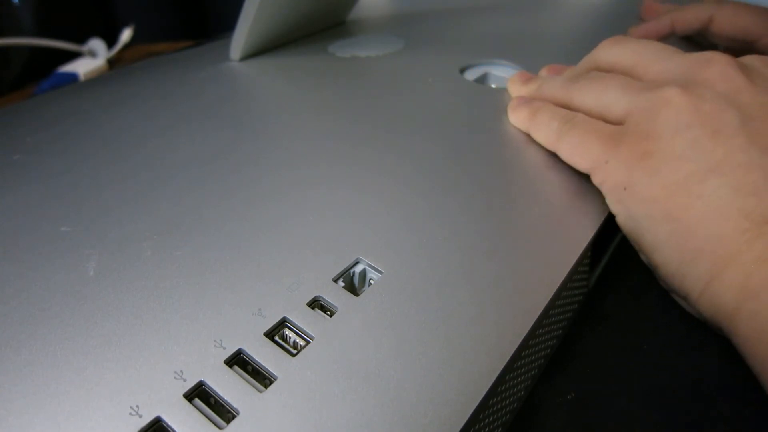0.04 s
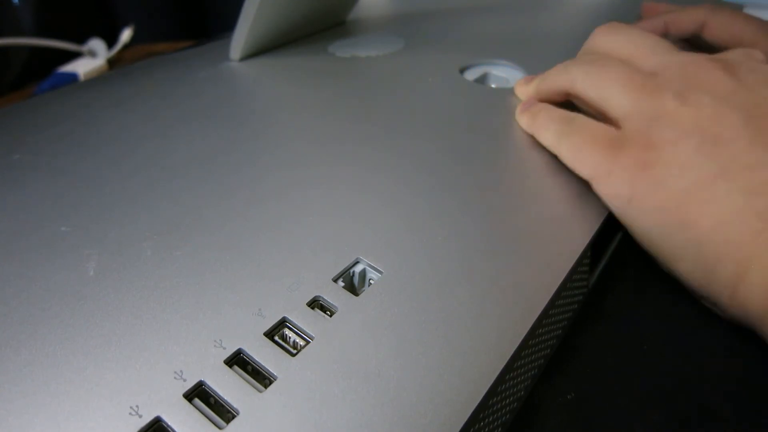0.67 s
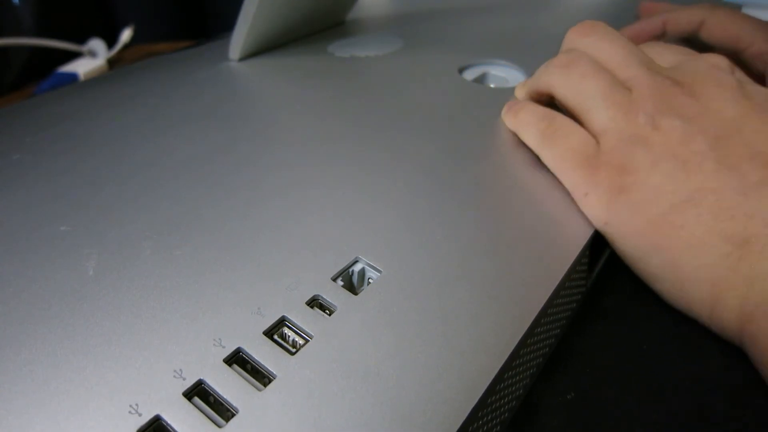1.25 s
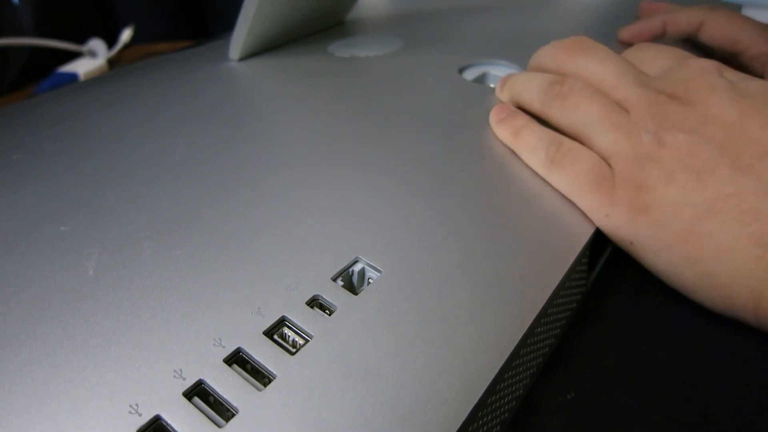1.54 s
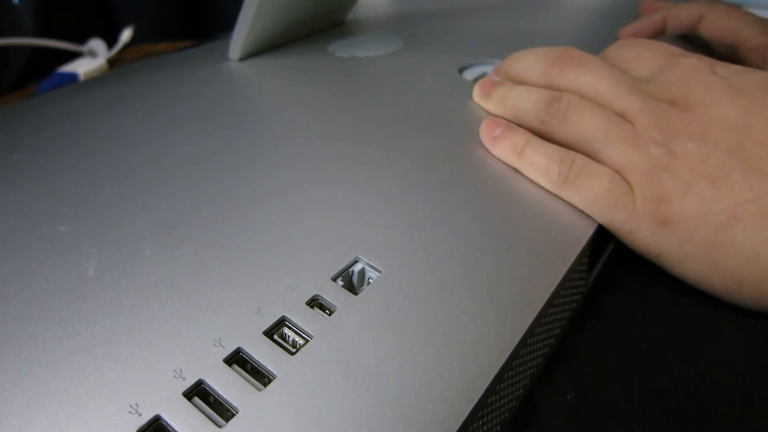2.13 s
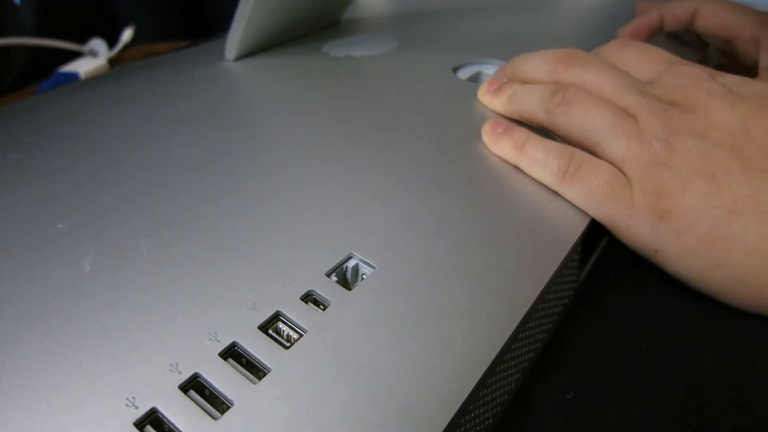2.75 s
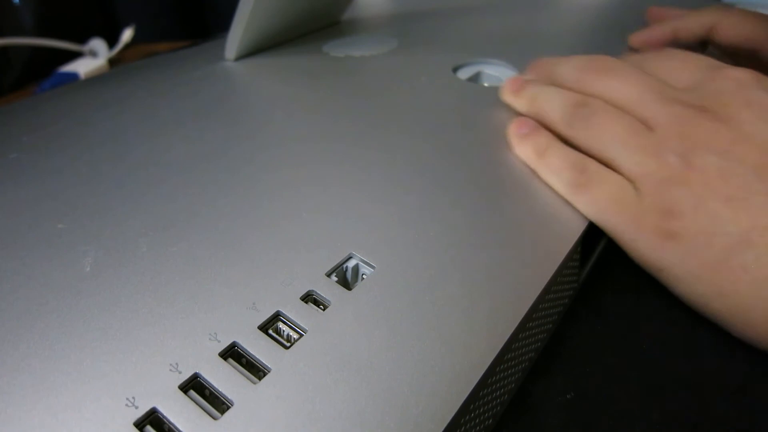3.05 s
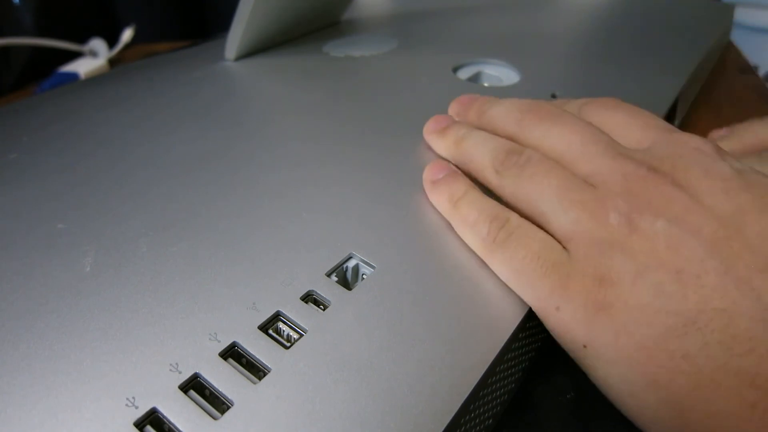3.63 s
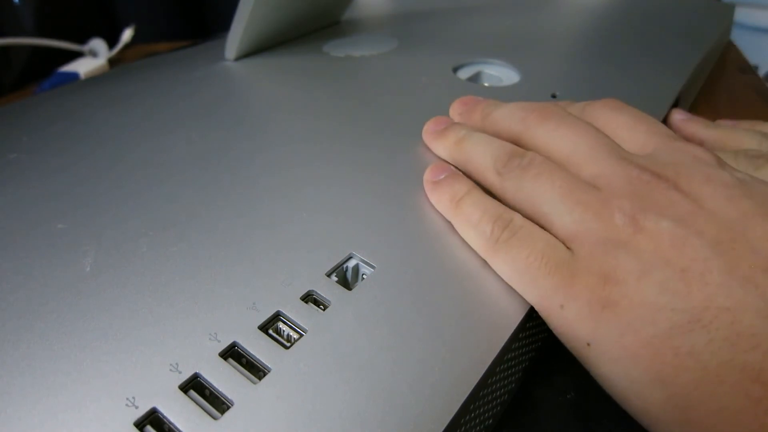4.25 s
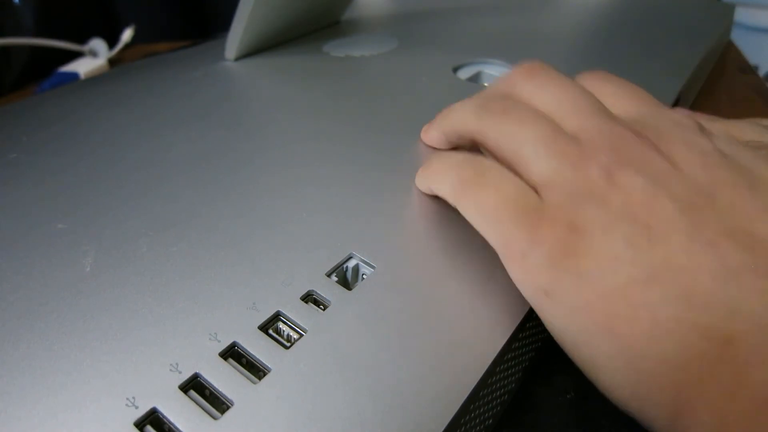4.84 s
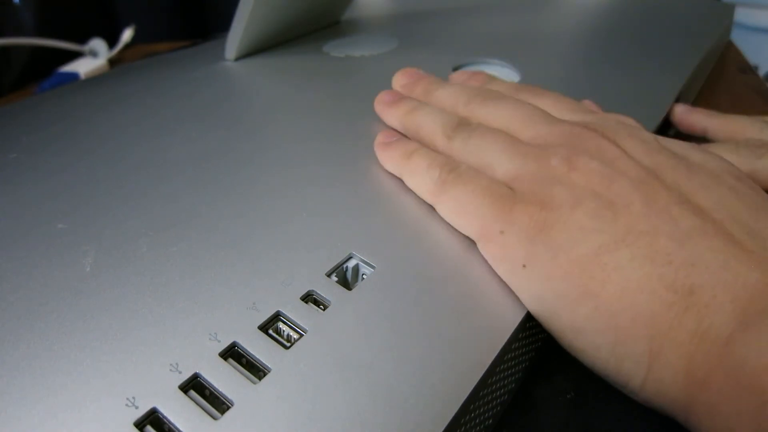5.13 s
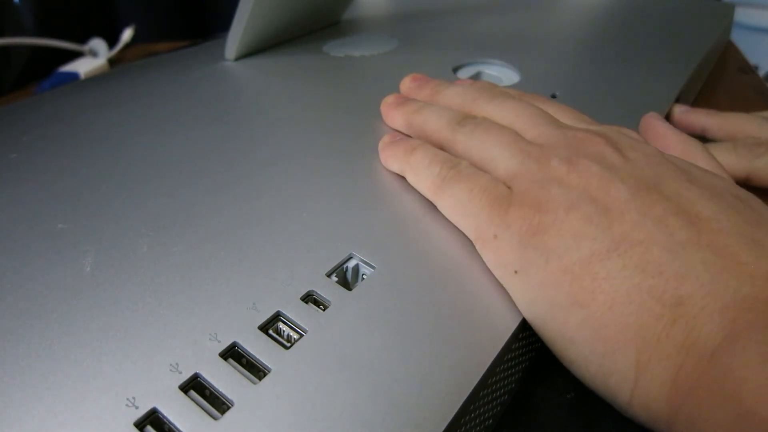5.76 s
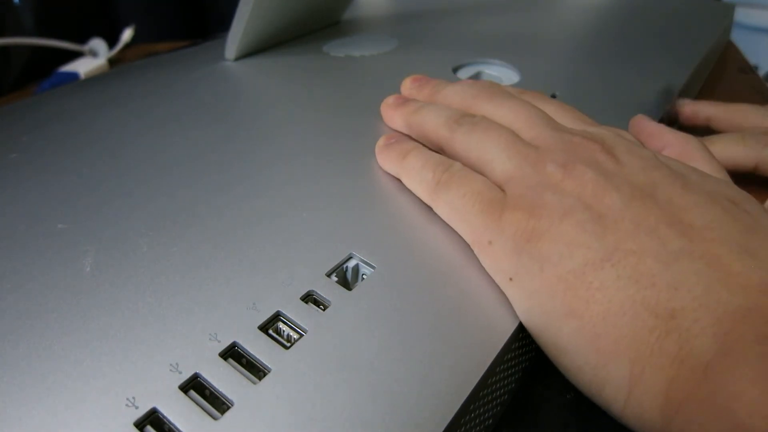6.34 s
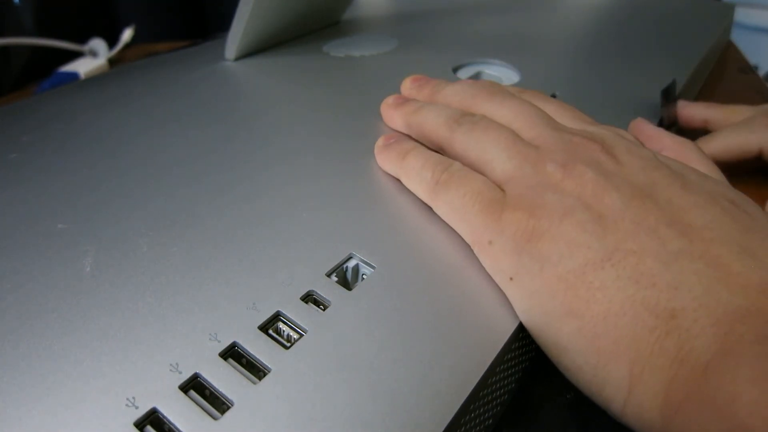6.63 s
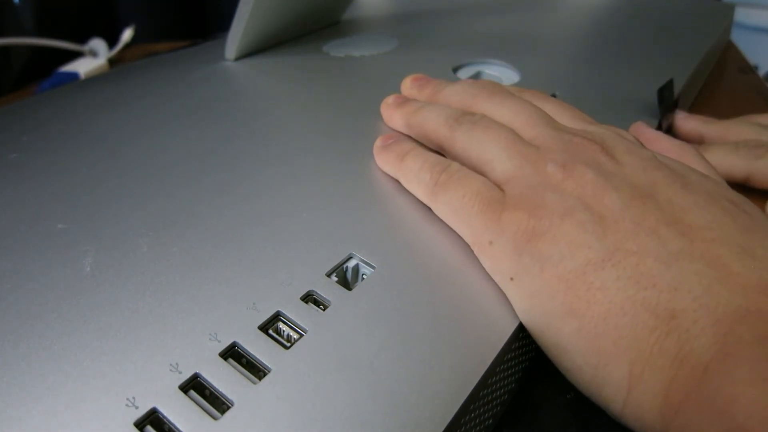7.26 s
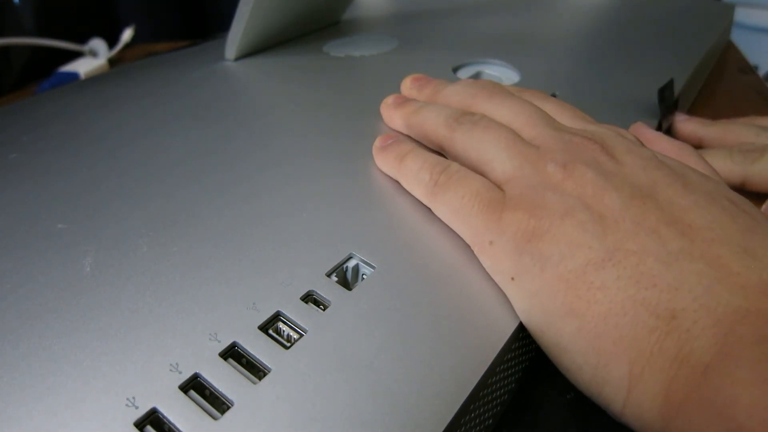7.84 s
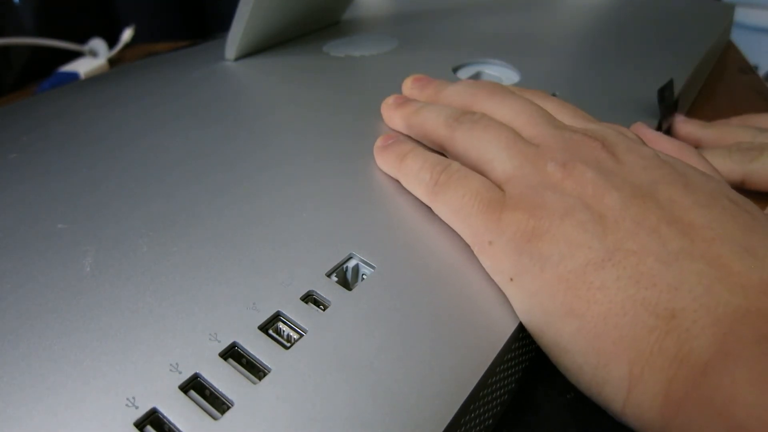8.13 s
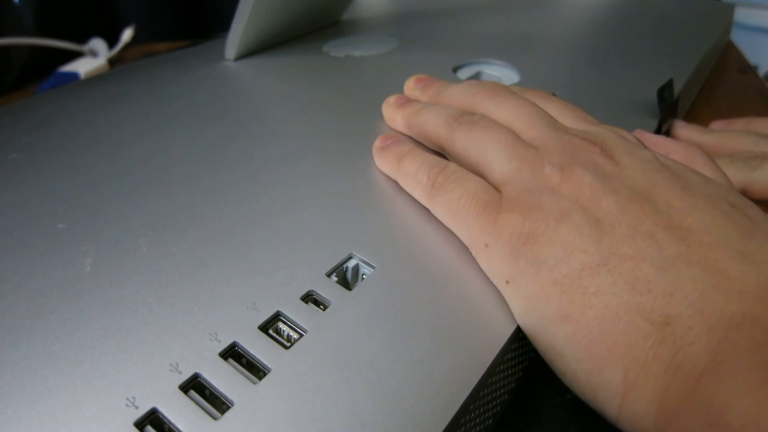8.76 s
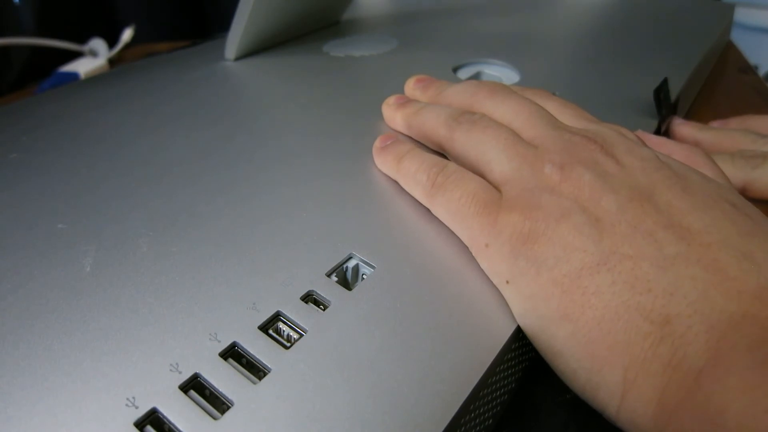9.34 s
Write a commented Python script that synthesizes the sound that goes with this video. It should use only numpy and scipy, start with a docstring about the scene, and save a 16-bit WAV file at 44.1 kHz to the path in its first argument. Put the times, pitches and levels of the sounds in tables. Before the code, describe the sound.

Fingers knock on a hollow metal computer case, then slide over it with a soft hiss and grip a panel. A latch snaps hard, and memory modules clack, squeak faintly and grind in their guides. Two more latch snaps follow, then a short grind, sparse ticks and one last firm clack. The sounds are close to the microphone, over the steady low hum of a small room.

```python
"""A hand presses memory modules into a metal-cased computer, over the steady hum of a small room.
First, fingers knock on the hollow case, slide over it and grip, shaking its panels.
At 3.3 s a latch snaps hard; gain control ducks everything and recovers slowly.
Up to 5 s modules clack, squeak and grind in their guides. Latches snap again at 5.9 and 6.3 s.
A short grind follows at 7 s, then sparse contact ticks and a last firm clack at 8.6 s."""
import sys
import numpy as np
from scipy import signal
from scipy.fft import rfft, irfft, next_fast_len
from scipy.io import wavfile
from scipy.ndimage import uniform_filter1d

SR = 44100
rng = np.random.default_rng(int(sys.argv[2]) if len(sys.argv) > 2 else 0)


def to_wav(s):
    """Save 16-bit WAV."""
    ch = np.atleast_2d(s).T  # columns
    pcm = np.round(np.clip(ch, -1, 1) * 32767)  # PCM
    wavfile.write(sys.argv[1], SR, pcm.astype(np.int16))


N = 414099
T = np.arange(int(0.45 * SR)) / SR  # time within one event [s]

# latches and edges snap home:
# (time [s], level [dB], case [dB re level], lead-in time constant [s], t60 [s], ring [Hz], top end [dB])
SNAPS = [(2.676, -25, -2.5, .0003, 0.0077, 3040, -5), (3.265, 1, -24.5, 0.0019, 0.018, 9100, -0.5),
         (3.4695, -22, -9, 0.0056, 0.033, 12800, -5), (3.588, -18.5, -16, 0.00091, 0.027, 12300, -3.5),
         (3.789, -10.5, -14.5, 0.00077, 0.016, 8200, -7), (5.894, -25, -2.5, 0.002, 0.022, 2550, 9),
         (5.903, -20.5, -8.5, 0.0016, 0.043, 2580, 1), (6.317, -17, -12.5, 0.0052, 0.012, 10000, -1),
         (6.3271, -4, -18, 0.00018, 0.022, 2650, 2.5), (6.9962, -27.5, -10, .001, .035, 8700, 0)]
# contact ticks: (time [s], level [dB], ring [Hz])
TICKS = [(2.9813, -24.5, 10700), (2.993, -31, 9000), (3.939, -36, 4700), (5.8335, -30.5, 9000),
         (5.861, -32, 9000), (6.961, -25.5, 2420), (6.972, -37, 2450), (6.983, -36, 2450),
         (7.009, -31, 8500), (7.021, -33.5, 9000), (7.3202, -34, 6000), (7.47, -34, 6600),
         (7.5251, -32, 12100), (7.7094, -33.5, 6960), (8.843, -34.5, 5900), (8.8657, -34.5, 5700)]
# fingers on the case: (time [s], level [dB], hardness as tilt [dB/octave])
KNOCKS = [(0.046, -24, 0), (0.132, -16.5, -3.5), (0.201, -12.5, 1), (0.689, -36.5, -3), (1.074, -16, .5),
          (1.463, -38, -4.5), (2.854, -21.5, 0.4), (3.078, -15, 0.1), (6.907, -37.5, -3.5),
          (8.276, -40, -6)]
# module against slot: (time [s], level [dB], crack [dB re level], rattle t60 [s])
CLACKS = [(0.589, -21.5, -18.5, 0.017), (0.756, -35, -8.5, 0.076), (1.041, -35.5, -20, 0.036),
          (1.504, -29.5, -24, 0.018), (1.537, -36, -6, .05), (2.317, -39.5, -5.5, .045),
          (2.342, -40.5, -2, .045), (3.723, -34.5, -9, .07), (3.913, -39, -6, 0.074),
          (4.273, -34, -11, .05), (4.471, -33.5, -20, 0.046), (4.638, -42.5, -18, .05),
          (4.731, -29, -22, 0.11), (4.915, -41.5, -20, 0.068), (5.207, -40.5, -23, 0.063),
          (5.332, -44.5, -7, .1), (6.253, -35, -8, .05), (6.339, -27, 1, 0.14), (6.971, -28, -14, 0.063),
          (8.583, -32, -15, 0.12), (8.5934, -17.5, -15, 0.044), (8.995, -44, -22, .06),
          (9.229, -41, -24, .05)]
# pushes that flex the shell: (time [s], level [dB], spectral centre [Hz])
PUSHES = [(.116, -24.5, 229), (.134, -11, 478), (.134, -20, 229), (.589, -32, 620), (1.076, -26, 229),
          (2.6, -32, 620), (2.65, -31, 229), (3.789, -18.5, 506), (4.471, -45, 640), (4.729, -24, 635),
          (5.903, -27.5, 620), (5.904, -21.5, 120), (5.918, -26, 229)]
# a module's edge binds: (time [s], level [dB], length [s], starting pitch [Hz])
SQUEAKS = [(0.587, -39.5, 0.021, 1442), (3, -42, 0.024, 1385), (3.588, -40, 0.016, 1227),
           (3.742, -42.5, 0.037, 1686), (3.788, -38.5, 0.024, 1370), (3.866, -59.5, 0.095, 1170),
           (4.262, -61.5, 0.057, 3280), (4.54, -62, 0.054, 3350)]
# friction strokes: (mid-stroke time [s], length [s], level [dB])
SLIDES = [(.365, 0.074, -53.5), (0.5, 0.13, -55), (.68, .16, -60), (1.245, 0.15, -46.5),
          (1.359, 0.068, -49.5), (1.475, 0.24, -49.5), (1.682, 0.16, -48), (1.867, 0.09, -54.5),
          (2.043, 0.22, -60), (2.607, 0.34, -51.5), (2.741, 0.1, -49.5), (3.037, 0.18, -44),
          (3.197, 0.26, -48), (3.37, 0.33, -42.5), (3.555, 0.32, -50), (3.754, 0.092, -44.5),
          (4.278, .07, -55), (4.734, 0.095, -51.5), (4.79, 1, -55), (4.978, 0.1, -60), (5.667, 0.31, -61.5),
          (7.06, 0.21, -55)]  # skin on smooth metal
RUBS = [(2.52, .08, -50.5), (2.625, 0.17, -36), (2.74, 0.11, -48), (3.007, 0.037, -41.5), (3.05, 0.03, -44),
        (3.165, 0.061, -49), (3.245, 0.035, -43.5)]  # skin gripping a panel
GRINDS = [(3.755, 0.048, -42.5), (4.29, 0.18, -54.5), (4.565, .09, -52), (4.66, 0.16, -54.5),
          (4.82, 0.11, -53.5), (6.98, .08, -47), (7.07, 0.18, -54)]  # module in its guides

# struck modes: (frequency [Hz], level [dB], t60 [s])
CASE_MODES = [(222, -10.5, 0.41), (419, -6, 0.22), (501, -21, 0.17), (655, 0.5, 0.1), (754, -2.5, .09),
              (888, -5, 0.075), (1039, -3.5, 0.1), (1155, -0.5, 0.16), (1537, 6.5, 0.06), (1770, -1, 0.064),
              (1923, 2.5, 0.085), (2370, 2.5, 0.056), (2890, -13, 0.033), (4250, -19, .06),
              (5130, -21, 0.078)]
SLOT_MODES = [(232.3, 0, 0.175), (500, -19, 0.26), (612, 4.5, 0.076), (920, -4, .045), (1366, -13, .05),
              (1393, 8, 0.019), (1570, -3, 0.021), (2290, 2, 0.031), (2600, 3.5, 0.02), (3080, -25, .035)]
# low shell modes: (frequency [Hz], t60 [s])
SHELL_MODES = [(120, 0.11), (229, 0.13), (500, 0.047), (622, 0.075)]
# resonances: (frequency [Hz], width [Hz], level [dB])
CASE_PEAKS = [(233, 32, 1.5), (500, 61, 0), (650, 66, -8.5), (1017, 31, -10.5), (1304, 17, -9),
              (1465, 92, -14.5), (2280, 250, -18)]
GUIDE_PEAKS = [(683, 78, 9.5), (1097, 98, 1.5), (1370, 180, 3), (1650, 91, -5), (2380, 250, 1),
               (3310, 210, -9), (4780, 590, -16)]
HUM_PEAKS = [(50.8, 16, -63), (153.6, 28, -56.5), (235.6, 17, -61.5), (10570, 700, -74)]  # room hum and a faint high whine
# spectral shapes: (frequency [Hz], relative level [dB])
LATCH_SPECTRUM = [(200, -5.5), (1000, -5), (2700, -1), (3900, -8), (5300, 2.5), (6500, 0), (8000, -1.5),
                  (9100, 2), (9500, 4.5), (9900, 1.5), (12000, 0.5), (14500, -4), (16500, -1)]
PANEL_SPECTRUM = [(100, -30), (300, -19), (430, 3), (700, -0.5), (1200, -4.5), (1700, -6.5), (2400, -10.5),
                  (3300, -17), (5000, -18.5), (8000, -49), (16000, -50)]  # dense case modes
BOOM_SPECTRUM = [(20, -54), (45, -60), (90, -11), (150, 0), (230, -1.5), (350, -5), (600, -38), (2000, -70)]
CRACK_SPECTRUM = [(1000, 9), (3000, -6.5), (5000, 1.5), (7000, 2), (11500, 2.5), (13500, -1.5),
                  (15200, -14), (16300, -23)]
SKIN_SPECTRUM = [(500, 5), (3000, -4.5), (5500, 0), (8000, 1.5), (11500, 3.5), (13500, 1), (15200, -9),
                 (16300, -25)]
ROOM_SPECTRUM = [(15, -39), (25, -29), (59, -6.5), (114, -6), (145, -1.5), (180, -8), (242, -7),
                 (301, -7.5), (326, -12), (489, -14), (734, -20), (2550, -30.5), (3250, -39.5),
                 (10700, -33.5), (16000, -36.5)]
# stereo width: (frequency [Hz], side gain [dB])
NEAR_WIDTH = [(150, -12), (600, -10.5), (2000, -7), (6000, -15.5), (10000, -15), (13500, -0.5)]
ROOM_WIDTH = [(60, 4), (110, 4), (200, 3.5), (380, 10.5), (700, 13), (1290, 14), (2380, 6.5), (4400, -1),
              (8120, -17), (15000, -57)]
# balance of the near sounds: (frequency [Hz], left re right [dB])
NEAR_BALANCE = [(200, 0.5), (700, -2.5), (2000, -1.5), (6000, -0.5), (13000, 0.5)]
# background drift: (time [s], gain [dB])
ROOM_DRIFT = [(0, 2.3), (3.2, 1.33), (5.3, 0.73), (9.39, -0.55)]


def snaps(snap_db=-6, case_db=-6, lead_s=0.025, lead_gain=0.42, ring_db=7, ring_octaves=0.29):
    """Contacts scrape in, the part snaps with a short ring, the case answers. Ticks are tiny snaps."""
    out = np.zeros((2, N))
    hz = np.geomspace(100, SR / 2, num=400)
    top_fade_hz = (8160, 13000)
    tick_case_db, tick_scrape_s, tick_t60_s = -9.5, 0.00044, 0.0077
    ticks = [(s, db, tick_case_db, tick_scrape_s, tick_t60_s, ring_hz, 0) for s, db, ring_hz in TICKS]
    for s, db, body_db, scrape_s, t60_s, ring_hz, top_db in list(SNAPS) + ticks:
        colour_db = at_hz(LATCH_SPECTRUM, hz) + np.interp(hz, top_fade_hz, [0, top_db])
        colour_db += ring_db * np.exp(-(np.log2(hz / ring_hz) / ring_octaves) ** 2)
        lead_in = np.exp(-T[:round(lead_s * SR)][::-1] / scrape_s)
        snap = shaped(burst(np.r_[lead_gain * lead_in, decay(t60_s)]), np.c_[hz, colour_db])
        add(out, s - len(lead_in) / SR, amp(db + snap_db) * snap)
        case = shaped(burst(decay(t60_s=0.09)), PANEL_SPECTRUM, tilt_db_oct=0.5)
        add(out, s, amp(db + body_db + case_db) * case)
    return out


def knocks(brush_db=-23):
    """Fingers strike the hollow case: a soft pad booms, a hard nail cracks."""
    out = np.zeros((2, N))
    for s, db, hardness in KNOCKS:
        brush(out, s, db + brush_db)
        knock = blow(CASE_MODES, PANEL_SPECTRUM, tilt_db_oct=hardness, ring_db=-5, rattle_db=-6,
                     boom_db=-26.5 - 5.5 * hardness, crack_db=-16.5 + 1.9 * hardness,
                     t60_s=0.097, crack_t60_s=0.11, rise_s=0.00038, bounce_gain=0.19, bounce_s=0.0071)
        add(out, s, amp(db) * knock)
    return out


def clacks(brush_db=-14):
    """A module bumps its slot and rattles the guides."""
    out = np.zeros((2, N))
    for s, db, crack_db, t60_s in CLACKS:
        brush(out, s, db + brush_db)
        clack = blow(SLOT_MODES, peak_spectrum(GUIDE_PEAKS), tilt_db_oct=0, ring_db=-2.5, rattle_db=-9.5,
                     boom_db=-23, crack_db=crack_db,
                     t60_s=t60_s, crack_t60_s=0.021, rise_s=0.001, bounce_gain=0.12, bounce_s=0.0076)
        add(out, s, amp(db) * clack)
    return out


def blow(modes, rattle_spectrum, tilt_db_oct, ring_db, rattle_db, boom_db, crack_db,
         t60_s, crack_t60_s, rise_s, bounce_gain, bounce_s):
    """One impact rings the modes, shakes loose parts twice, booms and gives a thin crack."""
    bounce = bounce_gain * np.interp(T - bounce_s, T, decay(t60_s / 2), left=0)
    sound = amp(ring_db) * ring(modes, tilt_db_oct)
    sound += amp(rattle_db) * shaped(burst(decay(t60_s) + bounce), rattle_spectrum, tilt_db_oct)
    sound += amp(boom_db) * shaped(burst(decay(t60_s)), BOOM_SPECTRUM)
    sound += amp(crack_db) * shaped(burst(decay(crack_t60_s)), CRACK_SPECTRUM)
    return sound * (1 - np.exp(-T / rise_s))


def ring(modes, tilt_db_oct, scatter_db=0.8):
    """Struck modes, mid and side: harder blows favour the high ones, each spot weights them anew."""
    hz, db, t60_s = np.transpose(modes)
    gains = amp(db + tilt_db_oct * np.log2(hz) + scatter_db * rng.standard_normal(len(hz)))
    waves = np.array([np.sin(2 * np.pi * f * T) * decay(s) for f, s in zip(hz, t60_s)])
    mid_side = np.array([(-1.) ** np.arange(len(hz)), rng.standard_normal(len(hz))])
    return (mid_side * gains / np.linalg.norm(gains)) @ waves


def brush(mix, s, db, length_s=0.023):
    """Adds the brushing of the surface just before a blow lands at time s."""
    approach = decay(t60_s=0.057)[:round(length_s * SR)][::-1]
    add(mix, s - len(approach) / SR, amp(db) * shaped(burst(approach), PANEL_SPECTRUM, tilt_db_oct=-4))


def shell_flex(width_octaves=0.15, rise_s=0.0044):
    """The shell gives under a push and swings back in the modes that suit the push's speed."""
    out = np.zeros(N)
    onset = 1 - np.exp(-T / rise_s)
    for s, db, centre_hz in PUSHES:
        for hz, t60_s in SHELL_MODES:
            share = np.exp(-(np.log2(hz / centre_hz) / width_octaves) ** 2)
            add(out, s, amp(db) * share * np.sin(2 * np.pi * hz * T) * decay(t60_s) * onset)
    return out


def squeaks(waver_share=0.073, sag_share=0.064):
    """An edge sticks and slips at a wavering pitch that sags as it comes free; mid only."""
    out = np.zeros((2, N))
    for s, db, length_s, start_hz in SQUEAKS:
        progress = T[T < length_s] / length_s
        waver = unit_rms(uniform_filter1d(rng.standard_normal(len(T)), size=120))[:len(progress)]
        hz = start_hz * (1 - sag_share * progress) * (1 + waver_share * waver)
        envelope = np.sin(np.pi * progress ** 0.5) ** 2
        add(out[0], s, amp(db) * unit_rms(envelope * np.sin(2 * np.pi * np.cumsum(hz) / SR)))
    return out


def slides(gain_db=-2, split_hz=8000, gentle_db=-54, low_share=0.76):
    """Skin hisses over smooth metal; quicker, louder strokes are brighter, as the low band gains less."""
    lowpass, highpass = (signal.butter(2, split_hz, kind, fs=SR, output="sos") for kind in ("low", "high"))
    low_strokes = [(s, length_s, gentle_db + low_share * (db - gentle_db)) for s, length_s, db in SLIDES]
    low_slips = stick_slip(low_strokes, arch_power=1.1, slips_per_s=5000, grain_db=4)
    high_slips = stick_slip(SLIDES, arch_power=1.76, slips_per_s=4500, grain_db=3)
    low = signal.sosfilt(lowpass, shaped(low_slips, SKIN_SPECTRUM))
    high = signal.sosfilt(highpass, shaped(high_slips, SKIN_SPECTRUM))
    return amp(gain_db) * (low * skin_pressure(depth_db=2.1) + high * skin_pressure(depth_db=0.6))


def skin_pressure(depth_db, window_samples=3000):
    """Uneven pressure: a gain that wanders over a few hundredths of a second."""
    wander = uniform_filter1d(rng.standard_normal(N), window_samples)
    return amp(depth_db * unit_rms(uniform_filter1d(wander, window_samples // 2)))


def rubs(gain_db=-1):
    """Skin grips and shakes the panel."""
    slips = stick_slip(RUBS, arch_power=1.2, slips_per_s=540, grain_db=1)
    return amp(gain_db) * shaped(slips, peak_spectrum(CASE_PEAKS))


def grinds():
    """A module jerks along its guides and excites their resonances."""
    slips = stick_slip(GRINDS, arch_power=1.34, slips_per_s=400, grain_db=2.2)
    return shaped(slips, peak_spectrum(GUIDE_PEAKS))


def stick_slip(strokes, arch_power, slips_per_s, grain_db):
    """Each stroke speeds up and slows in one arch, scattering jerks of uneven size."""
    envelope = np.zeros(N)
    for middle_s, length_s, db in strokes:
        progress = np.arange(0, length_s, 1 / SR) / length_s
        add(envelope, middle_s - length_s / 2, amp(db) * abs(np.sin(np.pi * progress)) ** arch_power)
    slipping = rng.random(N) < slips_per_s / SR
    sizes = amp(grain_db * np.minimum(rng.exponential(1, N), 3))
    return envelope * unit_rms(slipping * sizes * rng.choice([-1., 1.], (2, N)))


def reverb(x, wet_db, t60_s, treble_db, build_s=0.024):
    """The small room answers with a diffuse tail that builds up quickly."""
    tail = burst(decay(t60_s) * (1 - np.exp(-T / build_s)))
    spectrum = [(100, 0), (2500, 0), (6000, treble_db), (16000, treble_db - 4)]
    tail = shaped(tail / np.linalg.norm(tail[0]), spectrum)
    return amp(wet_db) * signal.oaconvolve(x[:1], tail, axes=1)[:, :N]


def room_hum(noise_db=-51):
    """Wide room noise with a few humming resonances, slowly easing in level."""
    size = next_fast_len(N)
    hz = np.fft.rfftfreq(size, 1 / SR)
    power = (amp(noise_db) * unit_rms(amp(at_hz(ROOM_SPECTRUM, hz)))) ** 2
    for peak_hz, width_hz, db in HUM_PEAKS:
        power += (amp(db) * unit_rms(resonance(hz, peak_hz, width_hz))) ** 2
    mid, side = rfft(rng.standard_normal((2, size))) * np.sqrt(power)
    side *= amp(at_hz(ROOM_WIDTH, hz))
    drift_db = np.interp(np.arange(N) / SR, *np.transpose(ROOM_DRIFT))
    return irfft(np.array([mid + side, mid - side]), size)[:, :N] * amp(drift_db)


def amp(db):
    """Decibels to gain."""
    return 10 ** (np.asarray(db) / 20)


def unit_rms(x):
    """Scales to rms 1."""
    return x / np.sqrt(np.mean(x ** 2) + 1e-20)


def at_hz(points, hz):
    """Reads a table on a log-frequency axis."""
    points_hz, values = np.transpose(points)
    return np.interp(np.log(hz + 1), np.log(points_hz + 1), values)


def add(mix, s, sound):
    """Mixes a sound in at time s."""
    part = mix[..., max(round(s * SR), 0):][..., :sound.shape[-1]]
    part += sound[..., :part.shape[-1]]


def decay(t60_s):
    """Envelope that loses 60 dB in t60_s."""
    return np.exp(-np.log(1000) * T / t60_s)


def burst(envelope):
    """A flurry of tiny impacts: two channels of enveloped noise, of fixed energy."""
    noise = rng.standard_normal((2, len(envelope))) * envelope
    return noise * np.linalg.norm(envelope) / np.linalg.norm(noise, axis=1, keepdims=True)


def resonance(hz, peak_hz, width_hz):
    """Bell curve of height 1, width_hz wide at half height."""
    return 1 / (1 + (2 * (hz - peak_hz) / width_hz) ** 2)


def peak_spectrum(peaks):
    """Summed resonances as (frequency [Hz], level [dB])."""
    hz = np.geomspace(30, SR / 2, num=600)
    gain = sum(amp(db) * resonance(hz, peak_hz, width_hz) ** 0.5 * np.minimum(peak_hz / hz, hz / peak_hz)
               for peak_hz, width_hz, db in peaks)
    return np.c_[hz, 20 * np.log10(gain)]


def shaped(x, spectrum, tilt_db_oct=0, n_taps=2048):
    """Minimum-phase filter of unit energy with the given spectrum and tilt."""
    hz = abs(np.fft.fftfreq(n_taps, 1 / SR))
    log_gain = np.log(amp(at_hz(spectrum, hz) + tilt_db_oct * np.log2(np.clip(hz, 300, 5000))))
    taps = np.fft.ifft(np.exp(np.conj(signal.hilbert(log_gain)))).real
    return signal.oaconvolve(x, taps[None] / np.linalg.norm(taps), axes=1)[:, :x.shape[1]]


def left_right(x):
    """Mid and side of the near sounds to left and right."""
    size = next_fast_len(N)
    hz = np.fft.rfftfreq(size, 1 / SR)
    mid, side = rfft(x, size)
    side *= amp(at_hz(NEAR_WIDTH, hz))
    lean = amp(at_hz(NEAR_BALANCE, hz) / 2)
    return irfft(np.array([(mid + side) * lean, (mid - side) / lean]), size)[:, :N]


def scene(inside_send_db=-10, friction_side_db=-10):
    """Impacts and friction in the humming room; clacks inside the case reach the room less."""
    outside, inside, clicks = knocks() + squeaks(), clacks(), snaps()
    echoes = reverb(outside + amp(inside_send_db) * inside, wet_db=-15, t60_s=0.3, treble_db=-6)
    echoes += reverb(clicks, wet_db=-19.5, t60_s=0.12, treble_db=7)
    friction = (slides() + rubs() + grinds()) * amp([[0], [friction_side_db]])
    return left_right(outside + inside + clicks + friction) + shell_flex() + echoes + room_hum()


def record(dry, threshold_db=-21, duck_share=0.44, peak_fall_db_per_s=11, attack_s=0.0013, edge_hz=16300):
    """Gain control ducks everything after the loudest snaps and recovers slowly; then a low-pass."""
    power_db = 10 * np.log10(abs(uniform_filter1d((dry ** 2).mean(0), size=100)) + 1e-12)
    fall_db = np.arange(N) / SR * peak_fall_db_per_s
    peak_db = np.maximum.accumulate(power_db + fall_db) - fall_db
    over_db = np.maximum(peak_db - threshold_db, 0)
    pole = np.exp(-1 / (attack_s * SR))
    duck_db = duck_share * signal.lfilter([1 - pole], [1, -pole], over_db)
    lowpass = signal.firwin(401, edge_hz, window=("kaiser", 9), fs=SR)
    return signal.oaconvolve(dry / amp(duck_db), lowpass[None], "same")


dry = scene()
out = record(dry)
to_wav(out)
```